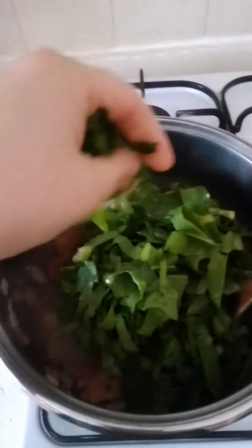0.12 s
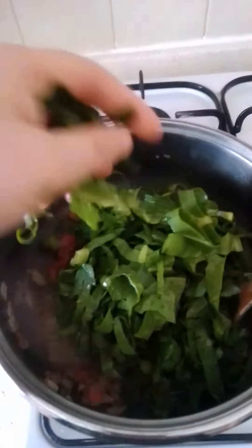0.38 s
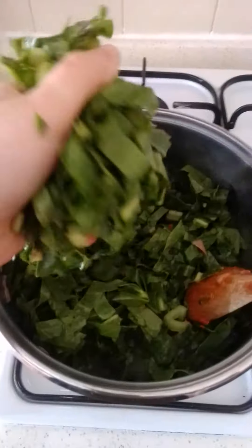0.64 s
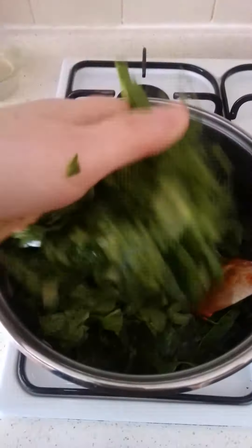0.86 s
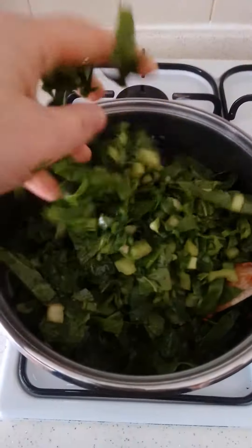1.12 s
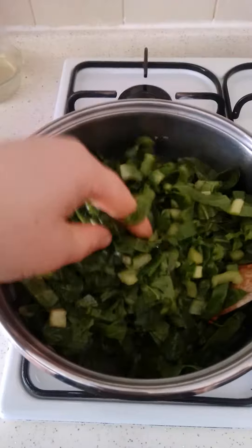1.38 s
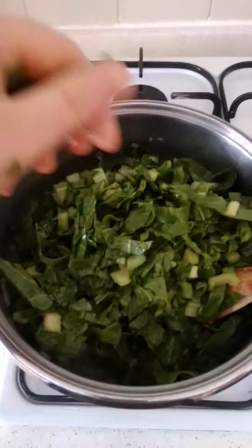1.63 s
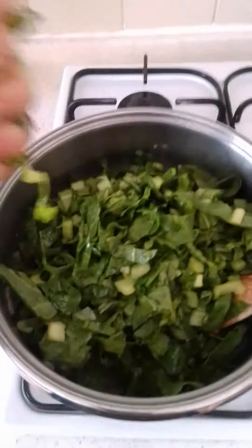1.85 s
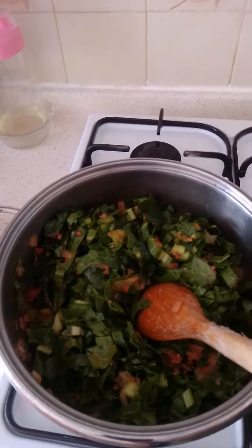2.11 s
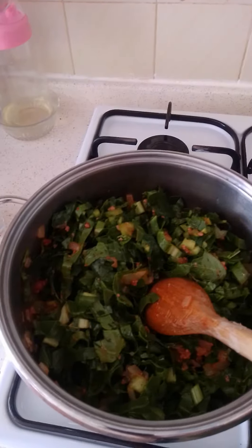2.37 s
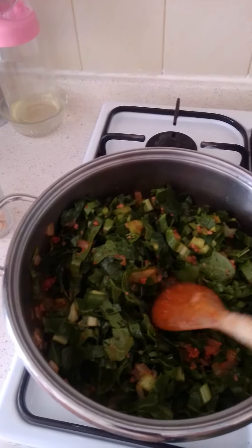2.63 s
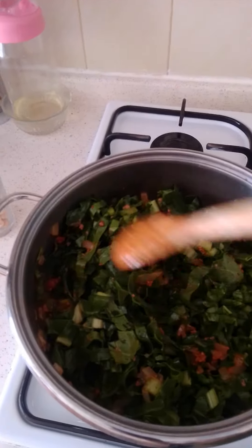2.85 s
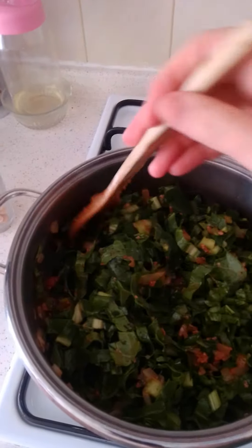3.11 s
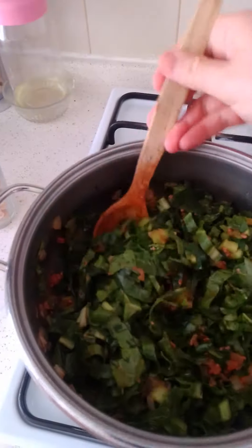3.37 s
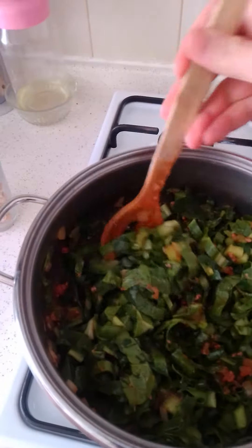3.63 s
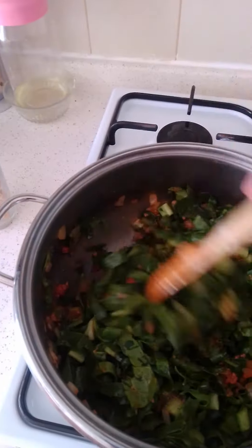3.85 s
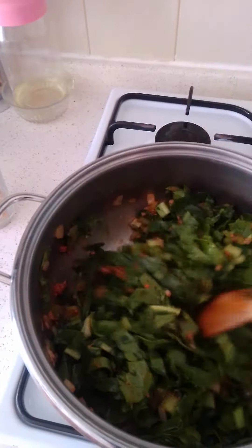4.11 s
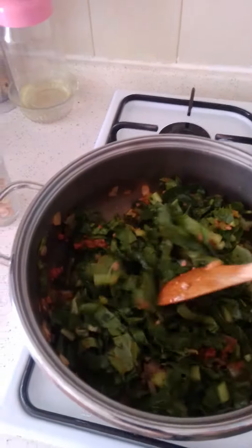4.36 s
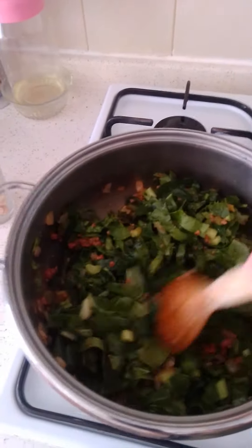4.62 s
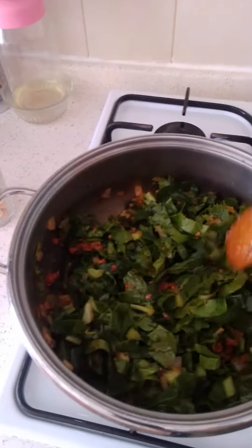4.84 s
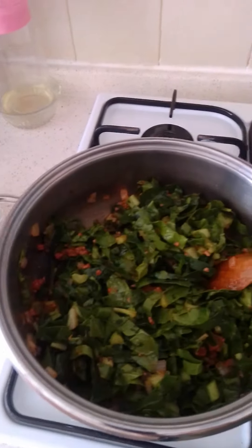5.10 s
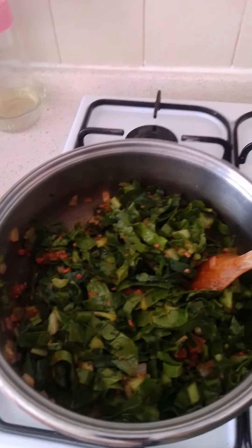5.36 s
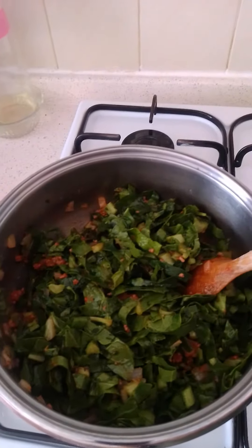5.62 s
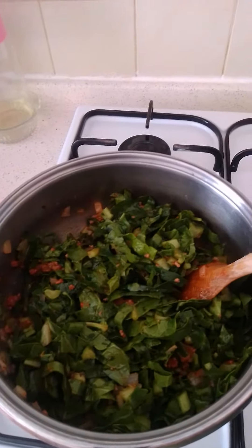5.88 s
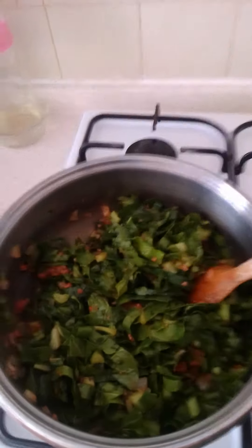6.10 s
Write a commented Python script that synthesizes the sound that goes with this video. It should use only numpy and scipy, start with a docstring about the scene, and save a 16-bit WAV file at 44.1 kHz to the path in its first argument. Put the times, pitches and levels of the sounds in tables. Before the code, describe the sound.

Close phone microphone in a small tiled kitchen. A brief burst of crisp, bright frying with sharp spits, a tiny gap, then a smoother steady sizzle as greens are dropped in, swelling just before a hard cut. The last take is quieter, thinned and warbly from noise reduction; a wooden spoon taps the steel pot, striking one loud sharp clack at mid-clip, then a few light knocks over soft sizzling.

```python
"""Greens frying in a steel pot

Oil fizzes (clumped noise bursts over hiss) and spits (tonal pops); heat slopes and flares set the fizz level.
A wooden spoon knocks the pot: noise crack, damped ringing modes, thud, kitchen echo.
Three phone shots with hard cuts; a noise suppressor lowers the bins that stay under its estimate."""
import sys
import numpy as np
from scipy import signal
from scipy.io import wavfile
from scipy.ndimage import uniform_filter1d

SR = 44100
rng = np.random.default_rng(int(sys.argv[2]) if len(sys.argv) > 2 else 0)


def gain_from_db(level_db):
    """Turn a decibel level (scalar or array-like) into a linear amplitude factor."""
    decades = np.asarray(level_db, float) / 20
    return 10 ** decades


def dump_mix(stems):
    """Bounce the given channels to the path in sys.argv[1] as a 16-bit WAV at rate SR."""
    frames = np.atleast_2d(stems).T  # one column per channel
    limited = np.clip(frames, -1, 1)  # hard clip at full scale
    pcm = np.round(limited * 32767).astype(np.int16)
    wavfile.write(sys.argv[1], SR, pcm)


N = 274887

# shots: start t/s, end t/s
SHOTS = [(0, .3055), (.4315, 1.9495), (1.9495, 6.1295)]


def evened(x):
    """Scales to rms 1."""
    return x / np.sqrt(np.mean(x ** 2) + 1e-20)


def read(points, hz):
    """Interpolates a (f/Hz, value) table over log frequency."""
    f, value = np.transpose(points)
    return np.interp(np.log(hz + 1), np.log(f + 1), value)


def add(mix, start_s, sound):
    """Mixes a sound in at start_s."""
    part = mix[round(start_s * SR):][:len(sound)]
    part += sound[:len(part)]


def coloured(x, points):
    """Minimum-phase filter with the given spectrum, so clicks stay sharp."""
    hz = abs(np.fft.fftfreq(4096, 1 / SR))
    log_gain = np.log(gain_from_db(read(points, hz)))
    phase = -signal.hilbert(log_gain).imag
    taps = np.fft.ifft(np.exp(log_gain + 1j * phase)).real[:2048]
    return signal.oaconvolve(x, taps)[:len(x)]


def puff(hz, decay_s, width):
    """A burst of steam: short dying noise, resonant at one pitch; width = bandwidth / pitch."""
    t = np.arange(600) / SR
    noise = rng.standard_normal(len(t))
    b, a = signal.iirpeak(np.clip(hz, 100, SR / 2.5), 1 / width, SR)
    body = signal.lfilter(b, a, noise) + 0.19 * noise
    return body * np.exp(-t / decay_s) * (1 - np.exp(-t / 0.00018))


def fizz(count, points, per_s, spread_db, smooth):
    """Steam bubbles: many small bursts of every pitch, in clumps, over a smooth hiss."""
    clumps = gain_from_db(4 * evened(uniform_filter1d(rng.standard_normal(count), 900)))
    bursts = np.zeros(count)
    for hz in np.geomspace(400, 12000, num=24):
        size = gain_from_db(spread_db * np.minimum(rng.exponential(1, count), 5))
        train = size * (rng.random(count) < per_s * clumps / SR / 24)
        burst = evened(puff(hz, 0.0014, 0.84)) * (hz / 1000) ** 0.56
        bursts += signal.oaconvolve(train, burst)[:count]
    smooth = np.clip(smooth, 0, 1)
    hiss = rng.standard_normal(count)
    mix = np.sqrt(1 - smooth) * evened(bursts) + np.sqrt(smooth) * hiss
    return evened(coloured(mix, points))


def heat():
    """Fizz gain: a slow dB slope per shot; greens dropped in or turned over make the fat flare up."""
    # fizz level without flares, per shot: start level/dB, end level/dB
    slopes = [(-38.5, -36), (-38, -39), (-45, -44.5)]
    # flares: peak t/s, rise/dB, length/s
    flares = [(1.153, 0.5, 0.62), (1.946, 4.5, 0.59), (3.304, 6, 0.32), (3.65, 3, 1), (4.308, 3.5, 0.59),
              (5.053, 2.5, 0.4), (5.27, 2, 0.54), (5.9, 1, 0.43)]
    rise_share = 0.55  # of the length
    t = np.arange(N) / SR
    db = np.interp(t, np.ravel(SHOTS), np.ravel(slopes))
    for peak_s, rise_db, length_s in flares:
        side_s = np.where(t < peak_s, rise_share, 1 - rise_share) * length_s
        cut_s = min(end for _, end in SHOTS if end + .05 > peak_s)  # a flare stops at the cut
        db += rise_db * np.clip(1 - abs(t - peak_s) / side_s, 0, 1) * (t < cut_s)
    return gain_from_db(db)


def frying():
    """Fizz follows the heat; single oil spits, a dying sine plus steam, share its colour."""
    # fizz colour, per shot: f/Hz, relative density/dB per Hz
    colours = [
        [(60, -48.5), (150, -29), (328, -8), (650, -4.5), (800, -11.5), (1080, -7.5), (1550, -13), (1900, -13),
         (2900, -5.5), (4200, -5.5), (5450, 0), (6800, -4), (8000, -4.5), (8700, 0), (9600, -8.5),
         (10600, -2.5), (12000, -15), (14000, -11), (16000, -47)],
        [(40, -18), (110, -17), (160, -23), (260, -6), (660, -0.5), (1080, 1.5), (1500, -6.5), (2500, -4),
         (3500, -3), (5000, -1.5), (6700, 3), (8600, -2), (9600, -3.5), (13000, -11.5), (16000, -13.5)],
        [(50, -17.5), (100, -7), (160, -18), (280, -2), (700, -1.5), (1000, -2.5), (1350, -1), (2300, -1),
         (3200, -3), (4200, -3.5), (5000, -13.5), (6500, -6), (8500, -5), (10000, -12.5), (13000, -16),
         (16000, -25.5)],
    ]
    # bubbling, per shot: nominal bursts/s, size spread/dB, power share of smooth hiss/0-1
    bubbling = [(886, -0.5, 0.52), (1500, 3, 0.72), (1200, 2, 0.66)]
    # loud spits: t/s, peak level/dB, f/Hz
    spits = [(0.0014, -23, 5270), (0.0496, -25, 5800), (0.1035, -17, 8660), (0.1436, -21.5, 8270),
             (0.175, -29, 8330), (0.1995, -22.5, 8800), (0.454, -24.5, 3620), (0.4847, -37.5, 7760),
             (0.704, -27, 7700), (1.0054, -36, 6040), (1.71, -29, 6270), (1.8492, -30, 5620),
             (2.1864, -48, 2170), (2.3516, -30, 3810), (2.5027, -47, 2330), (2.7597, -36.5, 2500),
             (3.3053, -39, 2290), (3.3316, -27.5, 7500), (4.1719, -31.5, 2350), (4.292, -33, 2130),
             (4.3198, -32.5, 2310), (4.422, -36, 2030), (5.0983, -31, 2460), (5.2551, -35, 2080),
             (5.703, -31, 2390)]
    out, level = np.zeros(N), heat()
    for (start, end), points, bubbles in zip(SHOTS, colours, bubbling):
        part = slice(round(start * SR), round(end * SR))
        add(out, start, level[part] * fizz(part.stop - part.start, points, *bubbles))
        for s, db, hz in (row for row in spits if start <= row[0] < end):
            steam = puff(hz, 0.0022, 0.32)
            t = np.arange(len(steam)) / SR
            pop = np.sin(2 * np.pi * hz * t) * np.exp(-t / 0.0011)
            spit = coloured(pop + steam / abs(steam).max(), points)
            add(out, s, gain_from_db(db) * spit / abs(spit).max())
    return out


def spoon():
    """Wood-on-steel crack, pot modes damped by the greens, and a resonant thud of the spoon."""
    # knocks: t/s, blow peak level/dB, brightness/dB per octave, thud f/Hz, thud peak level/dB
    knocks = [(3.012, -40, -9, 1240, -39), (3.091, -36, 3, 1220, -36.5), (3.097, -24, 0.5, 1300, -34),
              (3.294, -24, 3, 1200, -37), (3.449, -20, -2.5, 1200, -24.5), (3.459, -20.5, 1, 473, -27),
              (3.5135, -6, 1, 413, -30.5), (3.5219, -14, -0.5, 266, -48), (3.596, -25.5, 6.5, 1300, -48.5),
              (4.473, -27, 0, 1200, -39), (5.014, -30.5, -2.5, 598, -35), (5.046, -45, -2.5, 587, -39),
              (5.671, -29, -2, 1500, -36), (6.027, -31, -1.5, 755, -39.5), (6.1205, -27, -6, 303, -37)]
    # pot modes: f/Hz, relative level/dB, undamped t60/s
    modes = [(260, -20, 0.31), (334, -29, .3), (422, -32, 0.6), (755, -17.5, 0.23), (1032, -26.5, 0.91),
             (1250, -13.5, 0.27), (1503, -16.5, 0.3), (1617, -20, 0.3), (1850, -5, 0.038),
             (2080, -15, 0.088), (2144, 1, 0.054), (2676, -7.5, 0.066), (3130, -10.5, 0.15),
             (3220, -14.5, 0.14), (3502, -17.5, 1), (3560, -29, .6), (3727, -2, 0.039), (3455, -5.5, 0.082),
             (3970, -23, 0.19), (4560, -13.5, 0.12), (5620, -22.5, .12), (6480, -19.5, 0.18),
             (6720, -16, 0.092), (7200, -22, 0.052), (7620, -11, 0.037), (8500, -43, 0.19),
             (9000, -27, 0.092)]
    # wood on steel: f/Hz, relative density/dB per Hz
    crack_colour = [(90, -48), (170, -32), (250, -7), (500, -7.5), (1100, -3.5), (1730, -2), (2140, 0.5),
                    (2760, -7), (3500, -0.5), (4300, -10.5), (5030, -31), (5700, -25.5), (6500, -15),
                    (8600, -9), (9700, -19.5), (12500, -22), (15500, -36)]
    out, t = np.zeros(N), np.arange(SR // 2) / SR
    f, crack_db = np.transpose(crack_colour)
    for s, db, bright_db, thud_hz, thud_db in knocks:
        # greens shorten the ring; more for soft and for bright blows
        damp = max(0.73 + 0.04 * db - 0.015 * bright_db, .05)
        ring = np.zeros(len(t))
        for (hz, mode_db, t60_s), phase in zip(modes, rng.random(len(modes))):
            decay_db = mode_db + bright_db * np.log2(hz / 1000) - 60 * t / t60_s / damp
            ring += gain_from_db(decay_db) * np.sin(2 * np.pi * (hz * t + phase))
        rattle = rng.standard_normal(len(t)) * np.exp(-t / (0.012 * damp))
        crack = coloured(rattle, np.c_[f, crack_db + bright_db * np.log2(f / 1000)])
        steel = gain_from_db(0.19 * db)  # light blows land on greens more than on steel
        blow = steel * ring / abs(ring).max() + 1.55 * crack / abs(crack).max()
        blow *= 1 - np.exp(-t / 4e-4)
        push = np.r_[12, rng.standard_normal(len(t) - 1)] * np.exp(-t / 0.0046)
        b, a = signal.iirpeak(thud_hz, 2.5, SR)
        thud = signal.lfilter(b, a, signal.lfilter(b, a, push))
        add(out, s, gain_from_db(db) * blow / abs(blow).max() + gain_from_db(thud_db) * thud / abs(thud).max())
    return out


def kitchen(x):
    """Echo off the tiles: a noise tail of unit energy, each band dying at its own speed."""
    # reverberation: f/Hz, t60/s
    decay = [(250, 0.6), (700, 0.29), (1500, 0.23), (3000, 0.14), (7000, .25), (10000, 0.12),
             (12000, 0.058)]
    hz, t, z = signal.stft(rng.standard_normal(SR // 2), SR, nperseg=256)
    fade_db = -60 * t / read(decay, hz)[:, None]
    tail = signal.istft(z * gain_from_db(fade_db), SR, nperseg=256)[1]
    tail = np.r_[np.zeros(200), tail]  # 200 samples of delay
    return signal.fftconvolve(x, tail / np.linalg.norm(tail))[:N]


def near_silence():
    """Faint coloured noise after the last shot, with one faint resonant tick."""
    # noise colour: f/Hz, relative density/dB per Hz
    colour = [(30, -2.5), (80, 3), (130, -14), (200, -19.5), (700, -26.5), (2000, -49.5), (5000, -32),
              (16000, -50)]
    # tick: t/s, peak level/dB, f/Hz
    tick_s, tick_db, tick_hz = (6.206, -65, 750)
    noise = evened(coloured(rng.standard_normal(N), colour))
    out = gain_from_db(-87.5) * noise * (np.arange(N) / SR >= SHOTS[-1][1])
    tick = uniform_filter1d(puff(tick_hz, 0.0021, 1.1), size=14)
    add(out, tick_s, gain_from_db(tick_db) * tick / abs(tick).max())
    return out


def scene():
    """Frying, spoon and its echo gated to the shots, plus the near silence."""
    blows, t = spoon(), np.arange(N) / SR
    running = sum((t >= start) & (t < end) for start, end in SHOTS)
    pot = frying() + blows + gain_from_db(-4.0) * kitchen(blows)
    return (pot * running + near_silence())[None]


def suppress(x, start_s, estimate, wary, settled, soft_db):
    """Noise suppressor: lowers every STFT bin whose smoothed power stays under the noise estimate."""
    # attenuation of a shut bin: f/Hz, depth/dB
    depth = [(150, 25), (1000, 20.5), (3000, 23.5), (6000, 21), (12000, 23.5)]
    # bands held shut (+) or open (-): from t/s, to t/s, f/Hz, width/Hz, estimate offset/dB
    bands = [(.4, 0.952, 3650, 2320, 11), (.4, 0.94, 1740, 200, -12.5), (.4, 0.858, 2410, 170, -4.5),
             (.4, .9, 2070, 200, -2.5), (.95, 1.3, 3300, 900, 4.5), (0.61, 2.7, 4020, 270, -4.5),
             (1.848, 2.38, 1250, 450, 9), (1.76, 2.6, 753, 219.2, -8.5), (1.8, 3.2, 530, 130, 24),
             (1.84, 3.24, 1058, 182.4, 7), (2.72, 3.15, 2523, 190, -9), (3.14, 4.6, 5700, 200, 13),
             (3.1, 3.303, 3320, 1610, -6.5), (3.1, 3.3, 8000, 2600, -5), (4.098, 4.69, 8200, 185.2, -4),
             (4.044, 4.64, 3220, 189.8, -8.5), (5.012, 5.385, 4000, 252, -13),
             (5.031, 5.603, 3250, 190, -6), (5.1, 5.45, 3200, 1300, -3), (5, 5.45, 950, 300, -7),
             (5.75, 6.2, 2800, 200, -5), (4.96, 5.16, 9000, 400, -8), (5.43, 6, 2553, 221.4, -18),
             (5.54, 6.2, 457, 165.8, 31)]
    jump_db, hold_db = 5, 11  # smoothed power: limits below and above momentary power
    loud_over_db, loud_fades_db_per_s = 4, 31.5
    pull_per_db, pull_max_db, pull_rise_s = 0.75, 13.5, 0.047  # before the tilt
    pull_tilt_per_octave, pull_top_hz = .25, 9400
    flank_db, band_ease_s, error_rms_db = 8, 0.27, 2.16

    hz, t, z = signal.stft(x, SR, nperseg=1024, noverlap=768, boundary="even")
    power = abs(z) ** 2
    smoothed = uniform_filter1d(uniform_filter1d(power, size=3, axis=0), size=20, axis=1, origin=7)  # mostly past
    momentary = uniform_filter1d(uniform_filter1d(power, size=15, axis=0), size=3, axis=1)
    now_db = 10 * np.log10(momentary + 1e-20)
    power_db = np.clip(10 * np.log10(smoothed + 1e-20), now_db - jump_db, now_db + hold_db)
    usual_db = uniform_filter1d(np.median(power_db, axis=1), size=5)

    # the estimate starts offset and sinks as it learns, then settles
    octaves = np.log2(hz / 1500 + 0.065)[:, None]
    high_db, tilt, sinks, eases, lets_go_s = wary
    learning_db = high_db - sinks * t + octaves * (tilt - eases * t)
    settled_db = settled[0] + octaves * settled[1]
    raised_db = np.where(start_s + t < lets_go_s, learning_db, settled_db)

    # a loud moment pulls the estimate down for a while
    level_db = 10 * np.log10(power.sum(0) + 1e-20)
    fade_db = loud_fades_db_per_s * t
    excess_db = level_db - np.median(level_db) - loud_over_db
    loud_db = np.maximum.accumulate(excess_db + fade_db) - fade_db
    keep = np.exp(-t[1] / pull_rise_s)
    pull_db = signal.lfilter([1 - keep], [1, -keep], np.clip(pull_per_db * loud_db, 0, pull_max_db))
    raised_db -= pull_db * (1 + pull_tilt_per_octave * octaves) * (hz < pull_top_hz)[:, None]

    for first_s, last_s, band_hz, width_hz, band_db in bands:
        inside_s = np.minimum(start_s + t - first_s, last_s - start_s - t)
        while_on = np.clip(inside_s / band_ease_s + .5, 0, 1)
        shape = np.exp(-(2 * (hz - band_hz) / width_hz) ** 4)
        raised_db += band_db * np.outer(shape, while_on)

    # the estimate errs bin by bin and is slow to mend
    grain = uniform_filter1d(rng.standard_normal(z.shape), size=140, axis=1)
    raised_db += error_rms_db * evened(uniform_filter1d(grain, size=2, axis=0))

    over_db = power_db - (usual_db + read(estimate, hz))[:, None] - raised_db
    shut = 1 / (1 + np.exp(np.clip(over_db / soft_db, -30, 30)))
    beside_open = uniform_filter1d(1 - shut, size=13, axis=0)
    # shut bins beside open ones sink deeper
    lowered_db = shut * (read(depth, hz)[:, None] + flank_db * shut * beside_open)
    return signal.istft(z * gain_from_db(-lowered_db), SR, nperseg=1024, noverlap=768)[1][:len(x)]


def roll_off(x):
    """The treble ends steeply here."""
    return signal.sosfilt(signal.butter(12, 16110, fs=SR, output="sos"), x)


def record(dry):
    """Suppressor starts just after the second shot opens, learns anew at the next cut; then a low-pass."""
    # estimate above the usual level, last two shots: f/Hz, offset/dB
    estimates = [
        [(150, 4.5), (230, -1), (700, -8), (880, 5), (1050, -9.5), (1300, -3), (1420, 7), (1650, 6),
         (1750, 11.5), (1850, 5.5), (2000, -0.5), (2230, 6.5), (2450, -1), (2650, 8), (2900, 15), (3150, 3),
         (3450, -0.5), (3700, 6.5), (4000, 1), (4300, 33), (4600, -0.5), (4900, 0), (5200, -3.5), (6000, -10.5),
         (8500, -6), (8750, -6.5), (8950, 1.5), (9250, 11), (9600, 16), (16000, 21)],
        [(60, 19.5), (170, 16), (260, -1), (400, -7), (520, 10), (650, -9.5), (780, -5), (900, 5), (1000, 11.5),
         (1150, -12), (1350, -21.5), (1600, 4), (1750, -10), (1950, -10), (2200, -11), (2450, -13.5),
         (2600, 12), (2800, 0.5), (3200, 3.5), (3350, 4.5), (3600, 2.5), (3800, 3.5), (4050, 7), (4350, 7.5),
         (4700, 9), (5050, 22), (5400, 13), (5700, 12.5), (6100, 15), (6450, 11.5), (6800, 0.5), (7100, 7),
         (7350, 4), (7700, 1.5), (8000, 1.5), (8300, 3.5), (8600, 5), (9000, 3.5), (9200, 13), (9500, 23),
         (10000, 20.5), (16000, 24.5)],
    ]
    # learning, last two shots: start offset/dB, tilt/dB per octave, sinking/dB per s,
    # tilt easing/dB per octave per s, end t/s
    learning = [(1, 1, 5.5, 0.56, 1.6), (11.5, 6, 1.5, 2.74, 3.09)]
    # offset once settled, last two shots: level/dB, tilt/dB per octave
    settled = [(-5.5, -.5), (0, 1.5)]
    spans_s = [(.4695, SHOTS[1][1]), SHOTS[2]]
    out = dry.copy()
    for (start, end), *state in zip(spans_s, estimates, learning, settled):
        part = slice(round(start * SR), round(end * SR))
        out[0, part] = suppress(dry[0, part], start, *state, soft_db=2.5)
    low_pass = signal.firwin(255, 15750, window=("kaiser", 8), fs=SR)
    mix = signal.oaconvolve(out, low_pass[None], "same")
    return roll_off(mix)


dry = scene()
out = record(dry)
dump_mix(out)
```